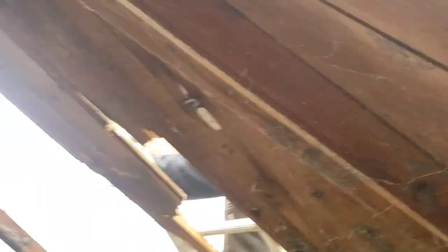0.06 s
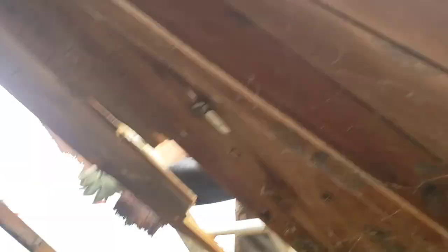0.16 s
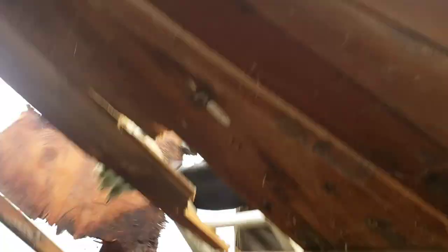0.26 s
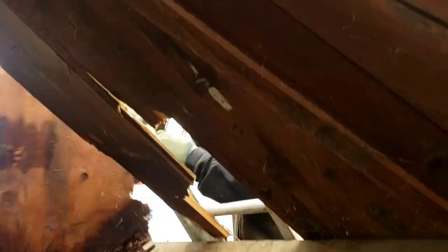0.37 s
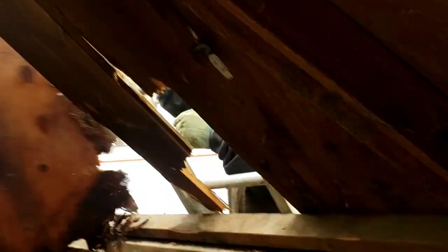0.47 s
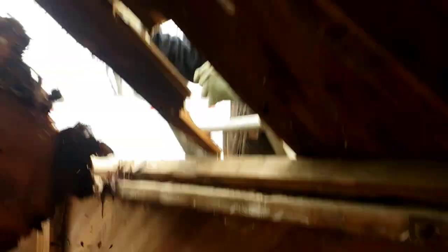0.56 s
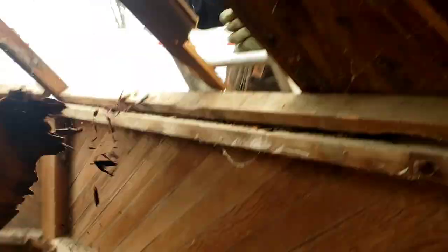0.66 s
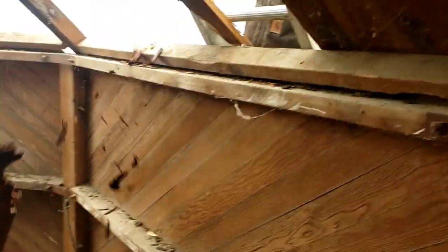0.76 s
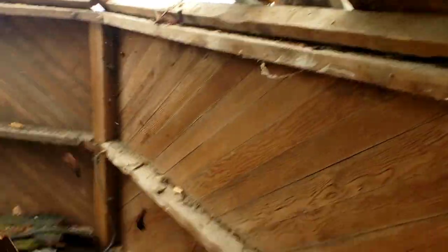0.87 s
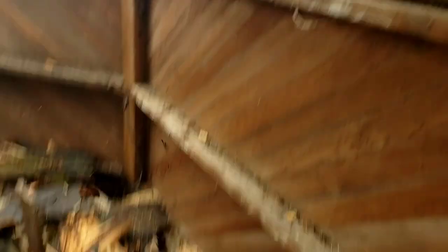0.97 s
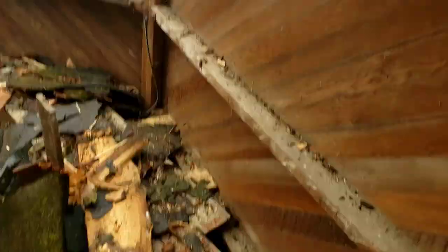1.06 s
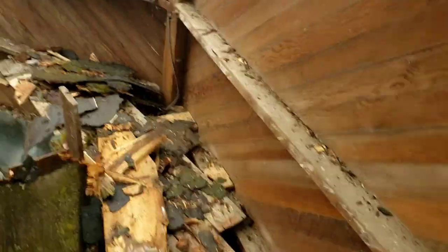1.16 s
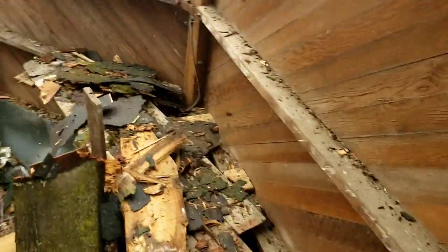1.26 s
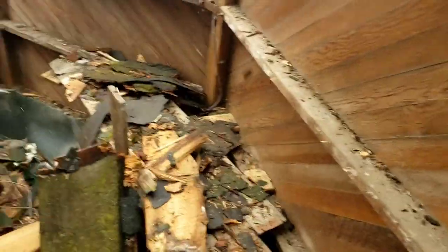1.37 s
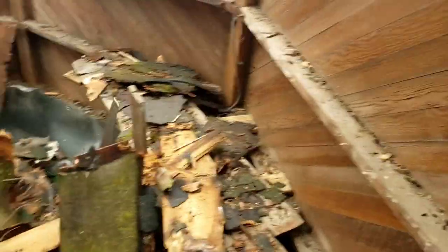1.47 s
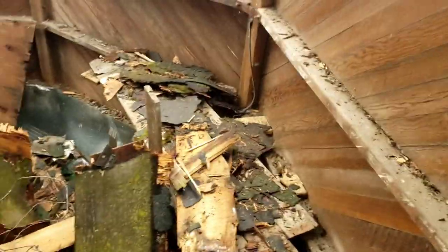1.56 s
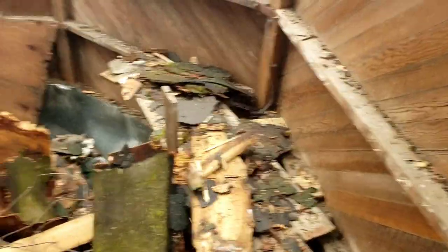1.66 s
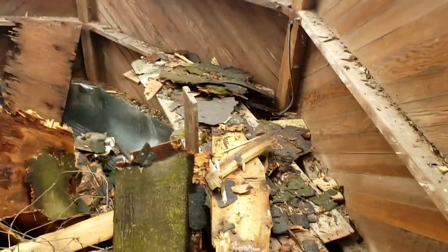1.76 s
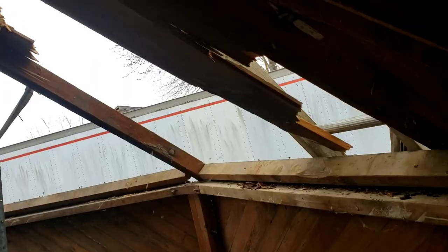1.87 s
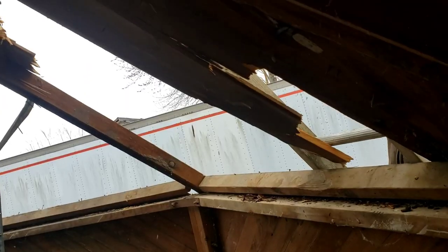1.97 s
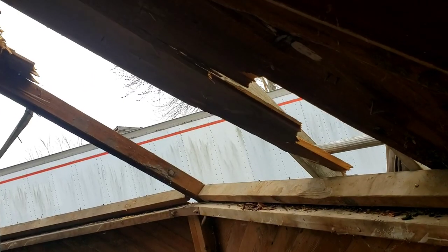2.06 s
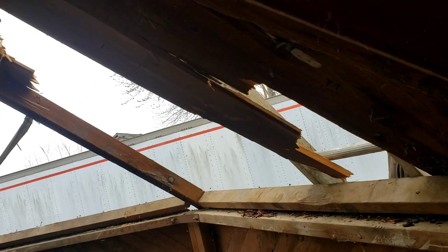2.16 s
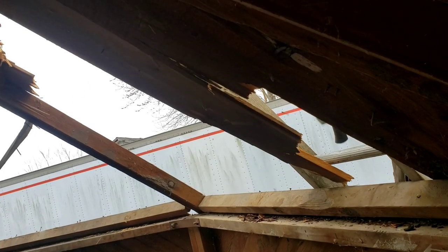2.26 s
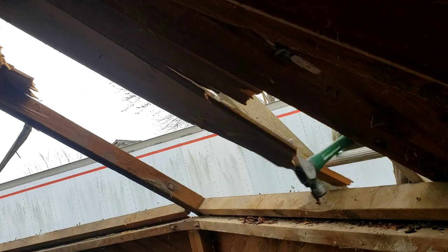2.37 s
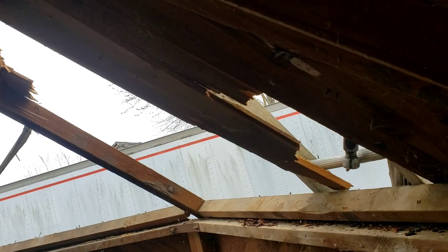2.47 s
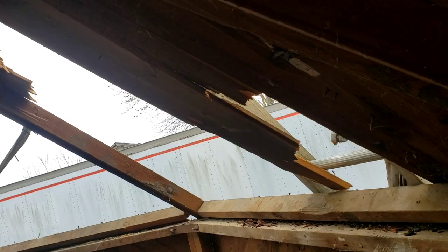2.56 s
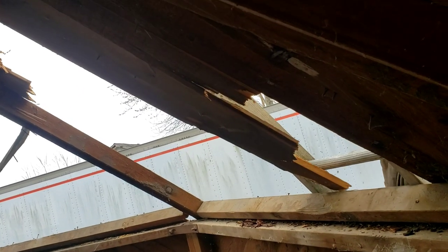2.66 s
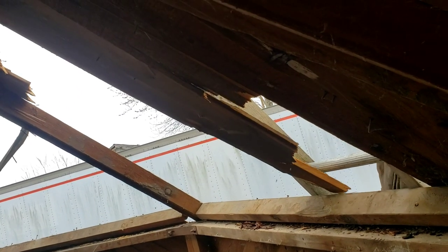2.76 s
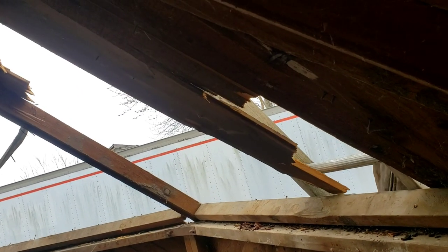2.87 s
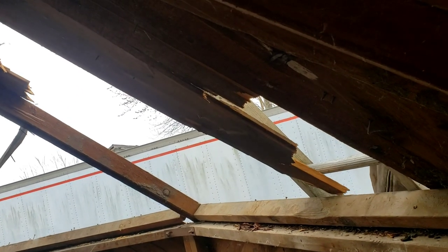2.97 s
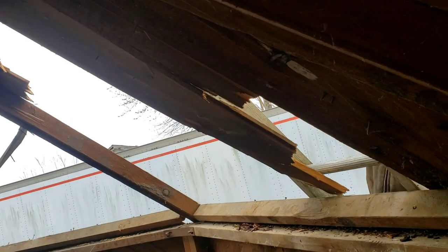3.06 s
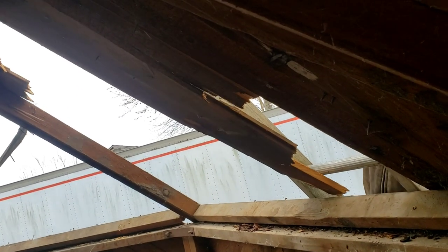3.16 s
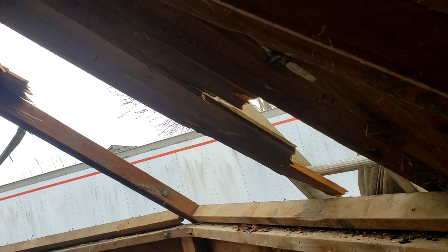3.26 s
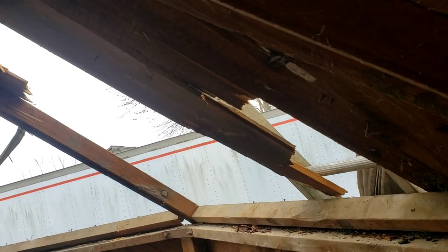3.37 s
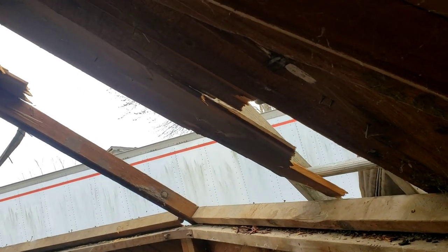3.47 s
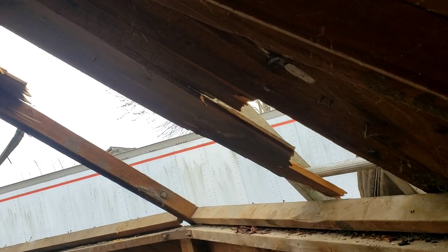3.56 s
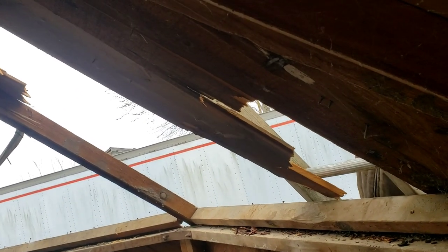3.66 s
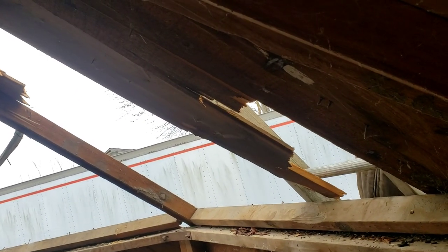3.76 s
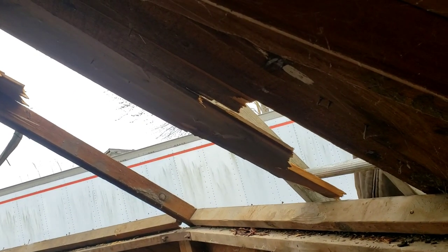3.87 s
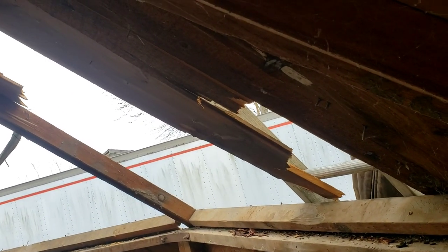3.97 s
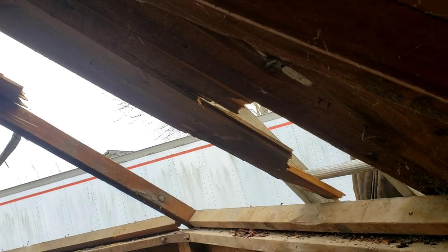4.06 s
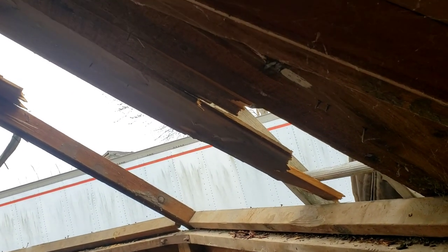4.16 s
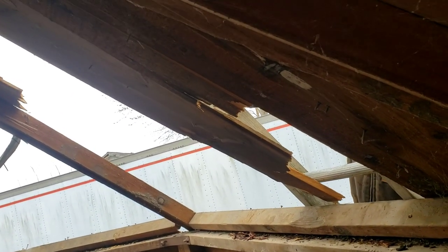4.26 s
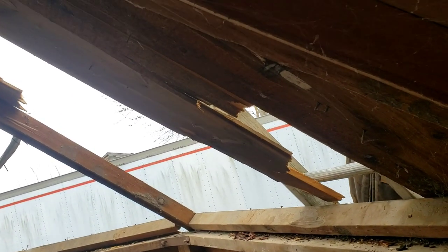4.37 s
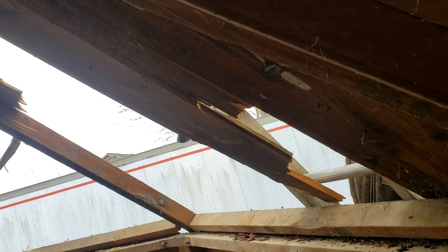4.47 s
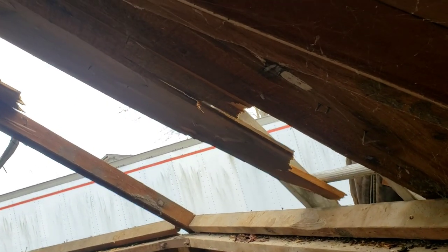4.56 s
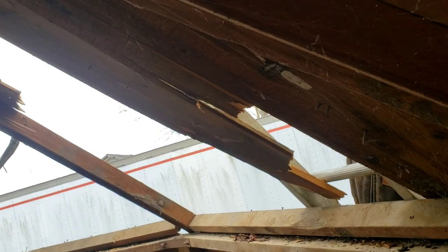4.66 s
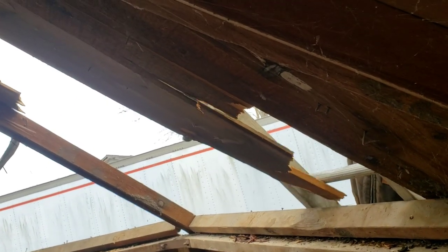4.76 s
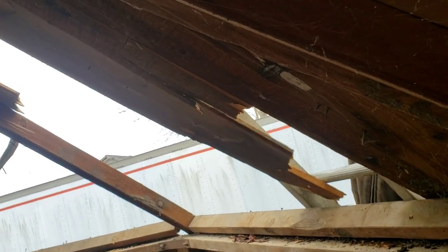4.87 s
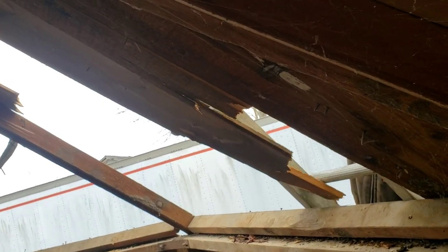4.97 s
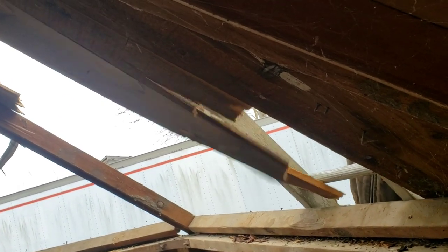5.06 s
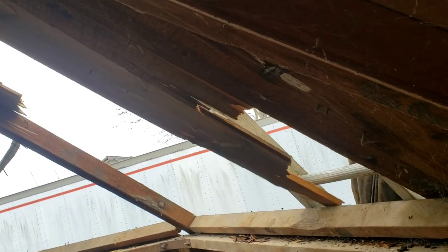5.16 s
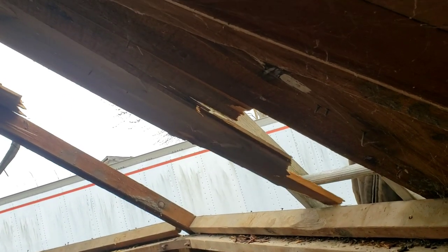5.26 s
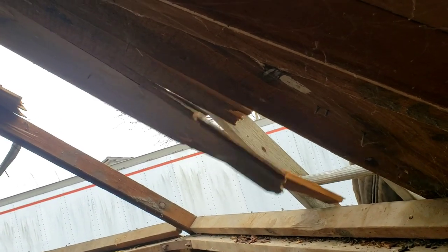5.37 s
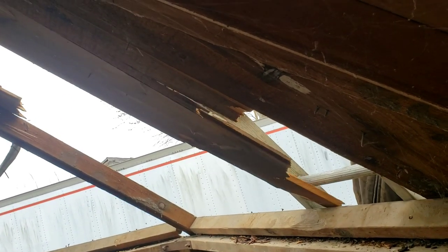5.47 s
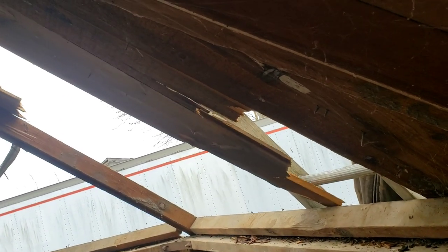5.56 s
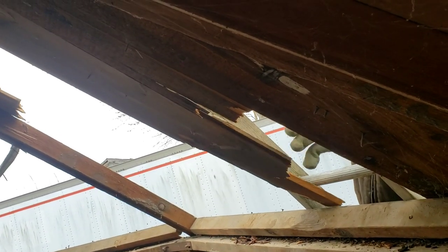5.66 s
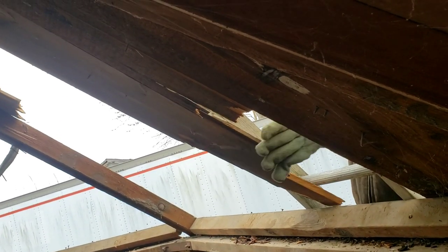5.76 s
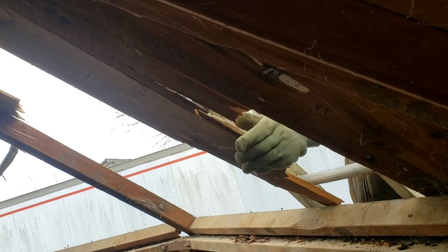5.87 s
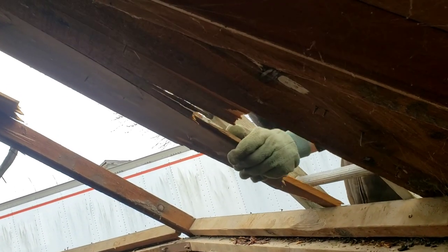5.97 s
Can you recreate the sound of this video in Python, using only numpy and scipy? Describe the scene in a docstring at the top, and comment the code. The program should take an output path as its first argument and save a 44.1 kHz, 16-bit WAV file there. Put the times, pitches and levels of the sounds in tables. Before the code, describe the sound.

Old wood breaks and showers grit, a struck steel bar rings, and four hard knocks shake a shed roof.

```python
"""Roof boards of a wooden shed, hammered and pried loose above a hand-held phone inside.
Blows shake the boards and ring a steel bar; rotten pieces snap and land, grit showers down.
Taps and grains excite the board modes and the room in five bands: thud, body, crack, sizzle, top.
An engine idles outside; wind buffets the two unlike microphone ports."""
import sys
import numpy as np
from scipy import signal
from scipy.fft import rfft, irfft, next_fast_len
from scipy.io import wavfile
from scipy.ndimage import uniform_filter1d

SR = 44100
rng = np.random.default_rng(int(sys.argv[2]) if len(sys.argv) > 2 else 0)


def persist_wave(psi):
    """Save psi, clipped to +-1, as 16-bit WAV."""
    counts = np.round(np.clip(psi, -1, 1) * 32767).astype(np.int16)
    wavfile.write(sys.argv[1], SR, np.atleast_2d(counts).T)


N = 264600
T = np.arange(N) / SR

# grit and tearing fibres (time [s], level [dB], brightness [dB])
GRIT_FLOW = [(0, -56, -3), (.07, -58, 1), (.28, -53, -4), (.36, -45, -0.5), (.55, -64, -3), (.62, -57, 5),
             (.8, -55.5, -7), (.99, -50, 1), (1.12, -39, -5), (1.15, -18, -5), (1.185, -16.5, -1.5),
             (1.26, -26, -0.5), (1.35, -32.5, -0.5), (1.52, -43.5, 1.5), (1.74, -43.5, 1),
             (1.98, -39.5, -7), (2.2, -56.5, -5), (2.37, -60, -13)]
# idle (time [s], firing tone [dB], octave [dB])
ENGINE_LEVELS = [(0, -47.5, -52), (.5, -36.5, -47), (1.1, -41.5, -43), (2.0, -44.5, -51),
                 (2.15, -59, -54.5), (3.6, -49.5, -56), (3.9, -42.5, -46.5), (4.5, -49, -52.5),
                 (6, -48.5, -53)]
# gusts (time [s], thump [dB], rumble [dB], left minus right [dB])
GUSTS = [(2.828, -52.5, -48.5, -24), (3.094, -38.5, -42.5, -24.5), (3.311, -59.5, -66.5, 11),
         (3.615, -46, -54.5, 26), (3.693, -47, -57, 15.5), (3.759, -48, -54, 18),
         (3.875, -47, -41.5, -11.5), (3.922, -31.5, -36.5, -25.5), (4.009, -47.5, -47, -17.5),
         (4.107, -53.5, -57.5, 5), (4.162, -45, -55.5, 19), (4.28, -65, -53.5, -1.5),
         (4.359, -60, -54.5, 14), (5.55, -74, -40, -10), (5.64, -63, -46.5, -28), (5.751, -63, -58, 8),
         (5.82, -50, -53, 10)]
# background (frequency [Hz], relative density [dB])
AIR_SPECTRUM = [(15, -41), (25, -24.5), (76, 5), (137, -14.5), (175, -16.5), (476, -36.5), (4140, -62),
                (6740, -53), (8140, -73), (14800, -68), (16000, -68)]
# roof shaken by tearing or blows (time [s], level [dB])
SHUDDERS = [(.04, -43.5), (.345, -23.5), (.47, -56), (.63, -47), (1.0, -28.5), (1.15, -31.5), (4.62, -36.5),
            (5.46, -35)]
# pieces breaking off or landing
# (time [s], body [dB], thud [dB re body], crack [dB re body], sizzle [dB re body], note [Hz], note [dB])
PIECE_HITS = [(.049, -25, -7.5, -18.5, -53, 534, -32.5), (.19, -58, 5, -8, -18, 298, -51),
              (0.333, -44, 6, 3, -9, 2600, -53), (.346, -20.5, -10.5, -41, -31, 344, -23.5),
              (.351, -45, 0, 3, -9, 2900, -22), (0.368, -35, -14, -30, -32, 298, -16),
              (.377, -23, -15, -13.5, -40, 3370, -25), (0.408, -41.5, -0.5, -2, -11, 318, -33.5),
              (0.42, -38.5, 7, -20, -28, 2780, -19), (.507, -45.5, 5, -0.5, -8.5, 270, -50),
              (0.568, -50.5, -5, 14.5, -11, 1750, -25), (.607, -31.5, -4.5, -2, -17.5, 247, -45.5),
              (.675, -30.5, -23, -16, -26, 571, -39.5), (.841, -43.5, -1, -8, -17.5, 380, -62),
              (0.908, -36.5, -2, -10, -20.5, 339, -64), (.998, -20.5, -0.5, -11, -17.5, 392, -34),
              (1.067, -18, -5, -22, -50, 905, -23), (1.086, -29, 3.5, 2, -13, 418, -34),
              (1.148, -19.5, -10, -4.5, -32, 400, -31.5), (1.582, -32.5, -26, -7.5, -37, 842, -35.5),
              (1.669, -42.5, -2, 3, -3, 1145, -41), (1.749, -30.5, -16, -18, -35, 303, -52),
              (1.765, -27.5, -5.5, -15, -48, 631, -33.5), (1.85, -30, -8.5, -5.5, -29, 530, -44),
              (1.896, -31, -5.5, -5, -12, 1144, -37), (2.116, -43, -17, -7, -17, 850, -39.5),
              (2.204, -49, 0, -2.5, -14.5, 410, -62.5), (2.547, -26, -10, -11, -13.5, 1244, -18),
              (2.67, -39, -15.5, -13.5, -10.5, 642, -38.5), (4.453, -47.5, -16, -9, -37, 1281, -32.5),
              (4.495, -50, -11, -7, -14, 1455, -39), (5.086, -49, 0, -13, -12, 396, -47),
              (5.378, -43.5, 13.5, -11, -4.5, 386, -49), (5.76, -54, -8, -2, -11, 421, -50),
              (5.859, -46.5, 1, -8.5, -23, 411, -49.5), (5.664, -38.5, -16, -9, -14, 312, -43)]
# blows on the boards (time [s], body [dB], thud [dB re body], crack [dB re body], top [dB re body])
BLOW_HITS = [(2.375, -16.5, -23, -3, -26.5), (2.391, -11.5, -16.5, -2, -25), (4.451, -30, -6, -7, -59),
             (4.595, -6.5, -12.5, -13.5, -40.5), (4.885, -5.5, -20.5, -11.5, -41),
             (5.149, -3.5, -23, -13.5, -32.5), (5.443, -5, -19.5, -8.5, -33)]
# tap spectra (frequency [Hz], relative density [dB])
PIECE_SPECTRUM = [(24, -31.5), (40, -1), (64, 5.5), (91, -2.5), (133, 0.5), (237, -3), (542, -1),
                  (1180, -9), (1630, -13), (3470, -23.5), (7000, -32.5), (8340, -44.5), (14800, -39),
                  (16000, -37.5)]
BLOW_SPECTRUM = [(24, -45), (40, -22.5), (69, 13), (109, 0), (345, 1.5), (556, -1), (663, 3), (1070, -10),
                 (1340, -12.5), (3380, -31), (6820, -32), (8550, -46), (14800, -41.5), (16000, -51)]
# shed response (low edge [Hz], high edge [Hz], t60 [s], left-right likeness [0-1], gain [dB])
SHED_BANDS = [(39.8, 168, 1, 0.93, -8), (200.5, 1140, 0.33, 0.7, -10), (1110, 3620, 0.36, 0, -6),
              (2720, 9460, 0.3, 0.03, -4.5), (8200, 22000, 0.22, 0.6, 2.5)]
# bar strikes (time [s], lowest mode [dB], upper modes [dB])
BAR_STRIKES = [(2.378, -80, -41), (2.393, -30, -36), (2.548, -80, -37), (2.669, -80, -52),
               (4.456, -80, -52)]
# modes (frequency [Hz], relative level [dB], t60 [s])
BOARD_MODES = [(198.8, 1, 0.7), (281.7, -1, 0.81), (374.3, 10, 0.22), (727, -14.5, 0.31), (818, -14, 0.34),
               (1150, -12.5, 0.34), (1410, -1.5, 0.28), (1561, -15, 0.26), (1946, -15, 0.35),
               (1892, -18, 0.3), (2116, -26, 0.41), (2300, -19.5, 0.39), (2288, -18.5, 0.28)]
BAR_MODES = [(3303, 0, .6), (4060, 3, .22), (5055, -9, .2), (5556, -10, .14), (6600, -12, .18),
             (6900, -13, .18), (10370, -14, .12), (10820, -11, .12)]
CLINK_MODES = [(3192, -50, .5), (3418, -57, .25)]
# port balance before and after the grip changes (frequency [Hz], left minus right [dB])
BALANCE_EARLY = [(60, -23), (110, 6), (200, -0.5), (380, 0.5), (700, 1.5), (1290, 1), (2380, 2), (4400, 5),
                 (8120, 20), (15000, 8)]
BALANCE_LATE = [(60, -14.5), (110, -14.5), (200, -10), (380, 1), (700, 3), (1290, 2), (2380, 4.5),
                (4400, 12), (8120, 32.5), (15000, 10)]
# right port delay (frequency [Hz], lag [rad])
RIGHT_LAG = [(0, 0), (750, .7), (1380, 3.7), (2500, 7.8), (22050, 62)]

GRIP_CHANGE_S, STEEL_RIGHT_LEAD_RAD = 1.12, 3.7


def undb(db):
    return 10 ** (np.asarray(db) / 20)


def unit(x):
    return x / np.sqrt(np.mean(x ** 2))


def band(x, lo_hz, hi_hz):
    return signal.sosfilt(signal.butter(2, [lo_hz, hi_hz], "band", fs=SR, output="sos"), x)


def add(out, start_s, x):
    k = int(start_s * SR)
    out[:, k:k + x.shape[-1]] += x


def pan(left_minus_right_db):
    return np.sqrt(2 / (1 + undb(2 * np.array([-left_minus_right_db, left_minus_right_db]))))


def rise(t, tau_s):
    return 1 - np.exp(-t / tau_s)


def curves(table):
    times_s, *columns = np.transpose(table)
    return [np.interp(T, times_s, column) for column in columns]


def db_at(spectrum, hz):
    knots_hz, db = np.transpose(spectrum)
    return np.interp(np.log(hz + 1), np.log(knots_hz), db)


def colour(x, spectrum, size):
    """Causal filter by cepstrum folding."""
    hz = np.arange(size // 2 + 1) * SR / size
    cepstrum = irfft(np.log(undb(db_at(spectrum, hz))))
    cepstrum[1:size // 2] *= 2
    cepstrum[size // 2 + 1:] = 0
    impulse = irfft(np.exp(rfft(cepstrum)))
    return signal.fftconvolve(x, impulse[None], axes=1)[:, :x.shape[1]]


def walk(rate_hz):
    """Random steps, slewed twice."""
    hold = int(SR / rate_hz)
    steps = np.repeat(rng.standard_normal(N // hold + 1), hold)
    return uniform_filter1d(uniform_filter1d(steps, hold), hold)[:N]


def swells(events, rise_s, fall_db_per_s):
    """One rise and decay per event; powers add."""
    ages = [((T - s).clip(0), db) for s, db in events]
    return np.sqrt(sum((undb(db - fall_db_per_s * t) * rise(t, rise_s)) ** 2 for t, db in ages))


def ring(modes, t, phases_rad):
    return sum(undb(db) * np.sin(2 * np.pi * hz * t + phase) * 1000. ** (-t / t60_s)
               for (hz, db, t60_s), phase in zip(modes, phases_rad))


def shed_response(spectrum, modes_db, rise_s, t60_scale, trim_db):
    """Boards and room tapped at one spot, by band. The right port faces the roof; the left fills later."""
    t, bands = np.arange(SR // 2) / SR, []
    modes = np.array(BOARD_MODES)
    modes[:, 1] += 6.3 * rng.standard_normal(len(modes))  # each spot excites the modes differently
    onset = rise(t, np.array(rise_s)[:, None])
    boards = ring(modes, t, np.zeros(len(modes))) * onset
    for lo_hz, hi_hz, t60_s, alike, gain_db in SHED_BANDS:
        noise = rng.standard_normal((3, len(t)))
        room = np.sqrt(alike) * noise[0] + np.sqrt(1 - alike) * noise[1:]
        room *= 1000. ** (-t / (t60_scale * t60_s)) * onset
        room = band(colour(room, spectrum, 2048), lo_hz, hi_hz)
        room /= np.sqrt(np.mean(room[:, :2000] ** 2))
        bands.append((room + undb(modes_db) * band(boards, lo_hz, hi_hz)) * undb(gain_db + trim_db))
    return np.array(bands)


def grit(spot, grains_per_s=700, scatter_db=4.5, tap_ring_s=.029):
    """Uneven grains from tearing boards, dust after each blow; too light to thud."""
    db, bright_db = curves(GRIT_FLOW)
    bands_db = np.array([db, db - 3.5 + .7 * bright_db, db - 11 + bright_db, db - 15 + 1.1 * bright_db])
    flow = undb(bands_db) * (T < GRIT_FLOW[-1][0])
    dust = swells([(s, body_db - 34.5) for s, body_db, *_ in BLOW_HITS], rise_s=.033, fall_db_per_s=41)
    dust = dust * undb([0, -6, -14.5, -30])[:, None]
    lands = rng.random(N) < grains_per_s / SR
    sizes = undb(scatter_db * rng.exponential(size=N).clip(0, 5))
    grains = unit(lands * sizes * rng.choice([-1, 1], N)) / np.sqrt(tap_ring_s * SR)
    return sum(signal.oaconvolve(train[None], response[:, :SR // 4], axes=1)[:, :N]
               for train, response in zip(grains * np.hypot(flow, dust), spot[1:]))


def engine(firing_hz=64.7):
    """Wavering firing tone and octave; shifts right with the grip."""
    tone_db, octave_db = curves(ENGINE_LEVELS)
    phase = 2 * np.pi * np.cumsum(firing_hz * (1 + .028 * walk(14))) / SR
    tone = undb(tone_db + 3 * walk(10)) * np.sin(phase)
    octave = undb(octave_db + 3.3 * walk(16)) * np.sin(2 * phase + 1)
    return (tone + octave) * pan(np.interp(T, [GRIP_CHANGE_S, GRIP_CHANGE_S + .1], [0, -13.5]))


def wind(floor_db=-65.5, thump_s=.013, top_hz=499, rumble_s=.056):
    """Unrelated eddies at each port; a gust is a dull thump inside a longer rumble."""
    t, thumps = np.arange(SR // 5) / SR, np.zeros((2, N + SR))
    power = undb(2 * floor_db)
    for s, thump_db, rumble_db, pan_db in GUSTS:
        noise = rng.standard_normal((2, len(t)))
        dull = unit(band(band(band(noise, 81, top_hz), 53, .67 * top_hz), 60, 2.5 * top_hz))
        sides = pan(pan_db)[:, None]
        add(thumps, s, undb(thump_db) * dull * t / thump_s * np.exp(1 - t / thump_s) * sides)
        swell = np.exp(-((T - s - thump_s) / rumble_s) ** 2)
        power = power + (undb(rumble_db) * swell * sides) ** 2
    flutter = undb(4.8 * walk(23))
    eddies = unit(band(band(rng.standard_normal((2, N)), 35, 170), 20, 330))
    return thumps[:, :N] + np.sqrt(power) * flutter * eddies


def air(hiss_db=-81.5):
    """Faint steady background."""
    noise = colour(rng.standard_normal((2, N)), AIR_SPECTRUM, 8192)
    return noise * undb(hiss_db) / np.sqrt(np.mean(band(noise, 700, 16000) ** 2))


def shudder():
    """Low rumble of the whole roof."""
    return swells(SHUDDERS, rise_s=.012, fall_db_per_s=89.5) * unit(band(rng.standard_normal(N), 37, 220))


def taps(hits, spots, rattle_s, rattle_db, fade, count):
    """Per hit: a tap at one spot, then a fading rattle over all spots."""
    out = np.zeros((2, N + SR))
    for k, (s, body_db, bands_db) in enumerate(hits):
        when, size, sign = rng.random((3, count))
        rattle = undb(rattle_db - 3.17 * np.log(size.clip(.01))) * np.sign(sign - .5) * (1 - fade * when)
        train = np.zeros((len(spots), 1, SR // 8))
        train[np.arange(count) % len(spots), 0, (when * rattle_s * SR).astype(int)] = rattle
        train[k % len(spots), 0, 0] = 1
        responses = np.tensordot(np.array(spots), undb(body_db + np.array(bands_db)), (1, 0))
        add(out, s, signal.fftconvolve(responses, train / np.linalg.norm(train), axes=2).sum(axis=0))
    return out[:, :N]


def pieces(spots):
    """Rotten pieces knock and rattle briefly."""
    hits = [(s, db, [thud, 0, crack, sizzle, sizzle - 9])
            for s, db, thud, crack, sizzle, *_ in PIECE_HITS]
    return taps(hits, spots, rattle_s=.017, rattle_db=-21, fade=.8, count=40)


def snaps(low_t60_s=.14, damping_hz=1580):
    """Dry crack and rough note of each piece; high notes die sooner."""
    t, out = np.arange(SR // 4) / SR, np.zeros((2, N + SR))
    for s, body_db, _, _, sizzle_db, note_hz, note_db in PIECE_HITS:
        noise = rng.standard_normal((2, len(t)))
        burst = noise[:1] * np.exp(-t / .0015)
        click = band(colour(burst, PIECE_SPECTRUM, 1024)[0], 3000, 15500)
        click *= undb(body_db + sizzle_db + 11) / click.max()
        t60_s = low_t60_s / (1 + (note_hz / damping_hz) ** 3)
        note = rise(t, .0026) * ring([(note_hz, note_db, t60_s)], t, [0])
        roughness = 1 + 9.6 * uniform_filter1d(noise[1], 200)
        add(out, s, click + roughness * note)
    return out[:, :N]


def blows(spots, sizzle_db=-16.5):
    """Hammer and bar strike the boards and rattle them."""
    hits = [(s, db, [thud, 0, crack, sizzle_db, top]) for s, db, thud, crack, top in BLOW_HITS]
    return taps(hits, spots, rattle_s=.046, rattle_db=-14.5, fade=1, count=90)


def contact(push_hz=380, push_s=.003):
    """Direct push and rebound of each blow, shadowed from the left port."""
    t, out = np.arange(300) / SR, np.zeros((2, N))
    push = np.sin(2 * np.pi * push_hz * t) * np.exp(-(t / push_s) ** 3)
    for s, body_db, *_ in BLOW_HITS:
        add(out, s + .0014, undb(body_db + np.array([[-15], [1]])) * push)
    return out


def bar():
    """Steel modes swell as the room fills; chatter on the wood blurs the upper ones."""
    t, out = np.arange(SR) / SR, np.zeros((2, N + SR))
    lowest, upper = BAR_MODES[:1], BAR_MODES[1:]
    phases = rng.uniform(0, 2 * np.pi, (len(BAR_STRIKES), len(BAR_MODES)))
    for (s, low_db, upper_db), phase in zip(BAR_STRIKES, phases):
        add(out[:1], s, undb(low_db) * rise(t, .016) * ring(lowest, t, phase))
        add(out[1:], s, undb(low_db + 3) * rise(t, .025) * ring(lowest, t, phase + STEEL_RIGHT_LEAD_RAD))
        chatter = .8 + .5 * unit(uniform_filter1d(rng.standard_normal((2, SR)), 300, axis=1))
        add(out, s, undb(upper_db) * rise(t, .0087) * chatter * ring(upper, t, phase[1:]))
    return out[:, :N]


def clink(start_s=4.485):
    """Small steel clink, two modes."""
    t, out = np.arange(SR) / SR, np.zeros((2, N + SR))
    sides = np.array([ring(CLINK_MODES, t, [phase, phase]) for phase in (0, STEEL_RIGHT_LEAD_RAD)])
    add(out, start_s, rise(t, .018) * sides)
    return out[:, :N]


def ports(x, crossfade_s=.034):
    """Left port thin and bright; right full, muffled and late. The balance shifts with the grip."""
    size = next_fast_len(N + 4096)
    hz = np.arange(size // 2 + 1) * SR / size
    lag_rad = np.interp(hz, *np.transpose(RIGHT_LAG)) * np.array([[0], [1]])
    spectrum = rfft(x, size) * np.exp(-1j * lag_rad)
    early, late = (irfft(spectrum * pan(db_at(balance, hz)), size)[:, :N]
                   for balance in (BALANCE_EARLY, BALANCE_LATE))
    turn = np.clip((T - GRIP_CHANGE_S) / crossfade_s, 0, 1)
    return early * (1 - turn) + late * turn


def scene():
    roof = [shed_response(BLOW_SPECTRUM, modes_db=-32, rise_s=(.012, .00048), t60_scale=.87, trim_db=-3)
            for _ in range(4)]
    heap = [shed_response(PIECE_SPECTRUM, modes_db=-29.5, rise_s=(.0011, .00072), t60_scale=1, trim_db=-3.5)
            for _ in range(3)]
    wood = blows(roof) + contact() + pieces(heap) + snaps() + grit(heap[0]) + grit(heap[1]) + shudder()
    steel = (bar() + clink()) * undb(2 * walk(25))  # the level flickers
    return ports(wood + steel + air()) + engine() + wind()


def record(dry, top_hz=15900):
    """The phone rounds the loudest peaks and cuts the top."""
    lowpass = signal.ellip(10, .2, 80, top_hz, fs=SR, output="sos")
    return signal.sosfilt(lowpass, np.tanh(dry) / .59)


dry = scene()
out = record(dry)
persist_wave(out)
```